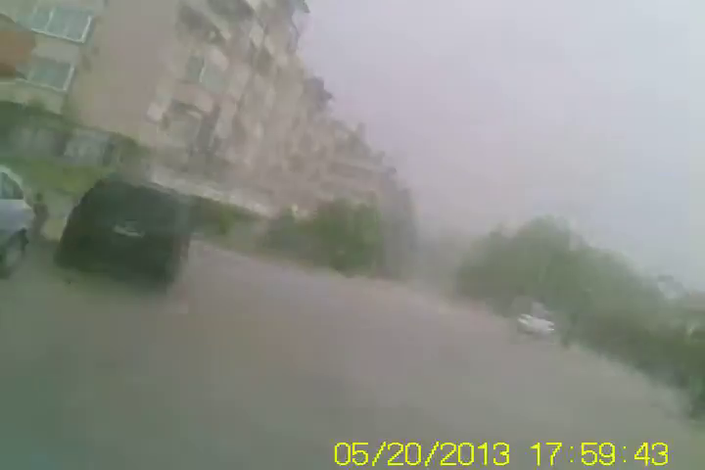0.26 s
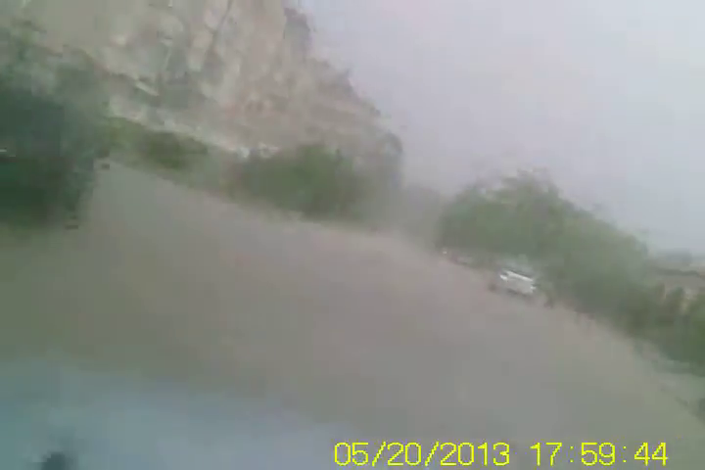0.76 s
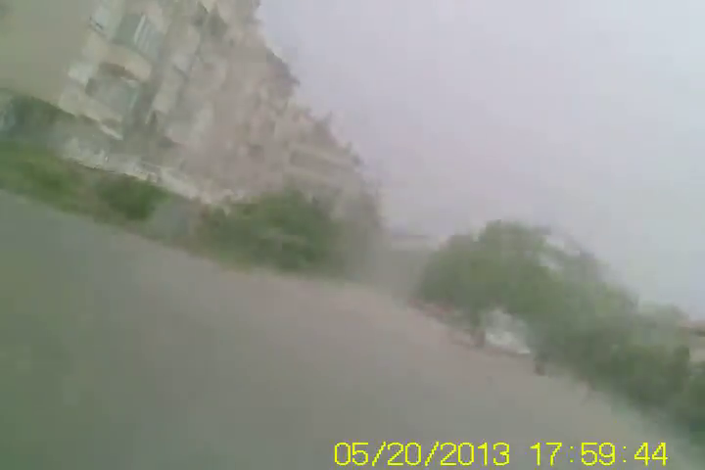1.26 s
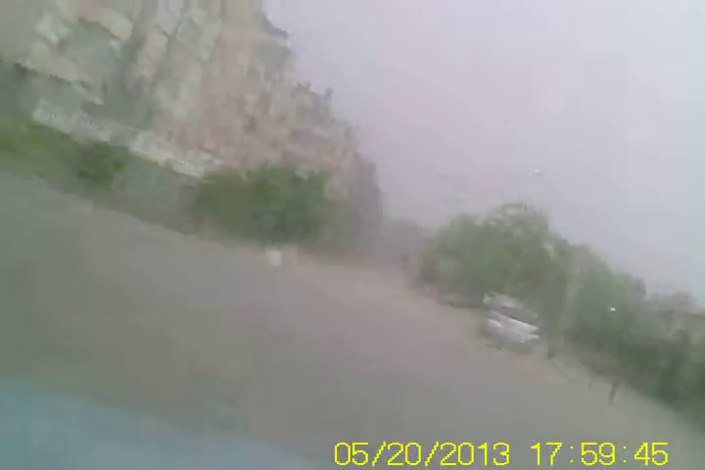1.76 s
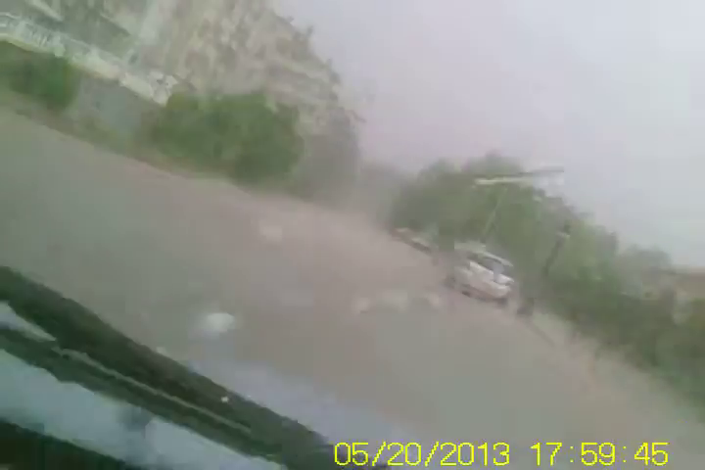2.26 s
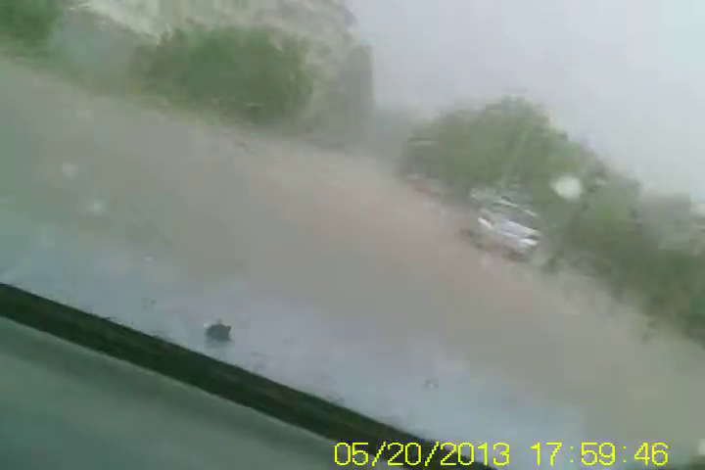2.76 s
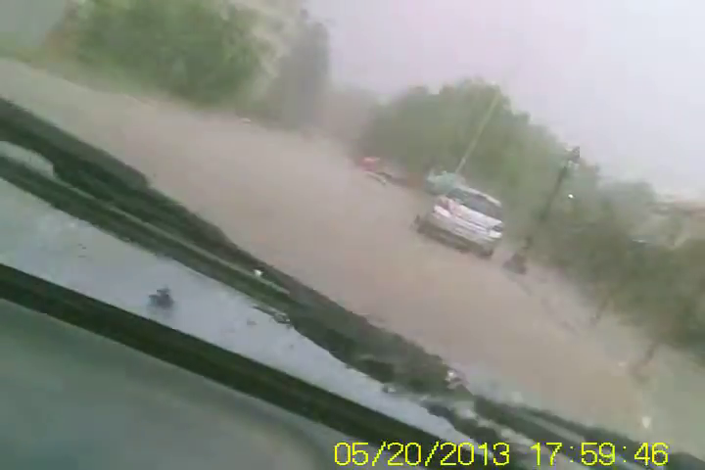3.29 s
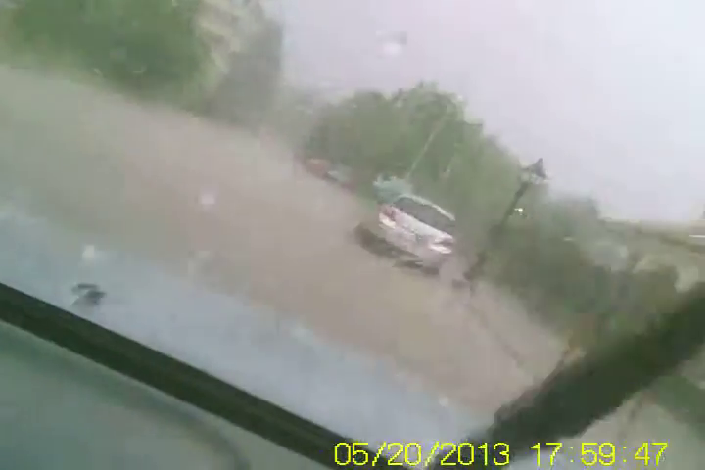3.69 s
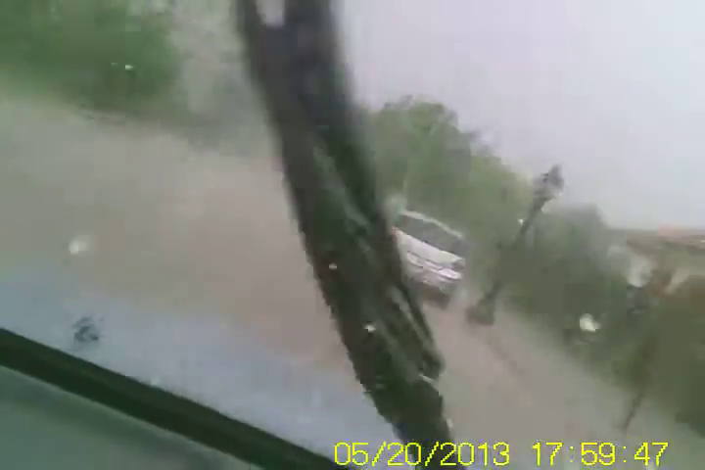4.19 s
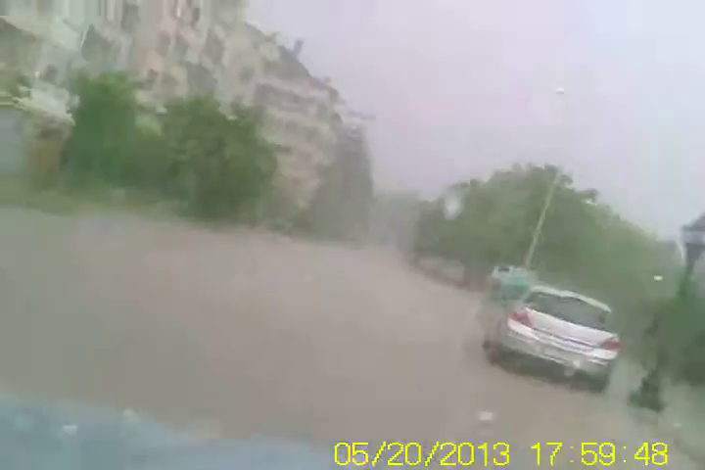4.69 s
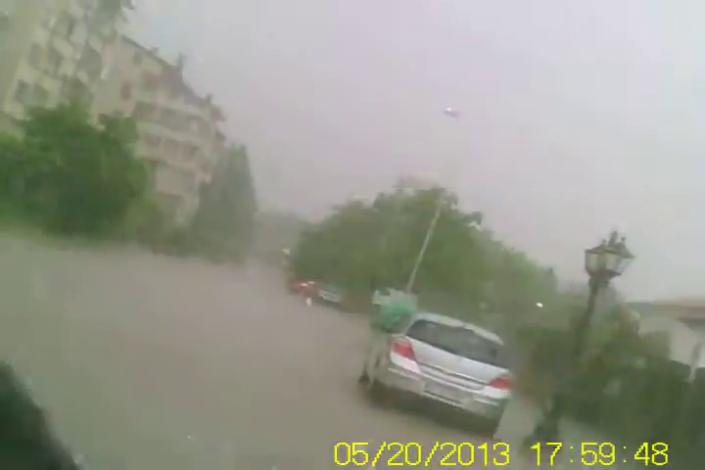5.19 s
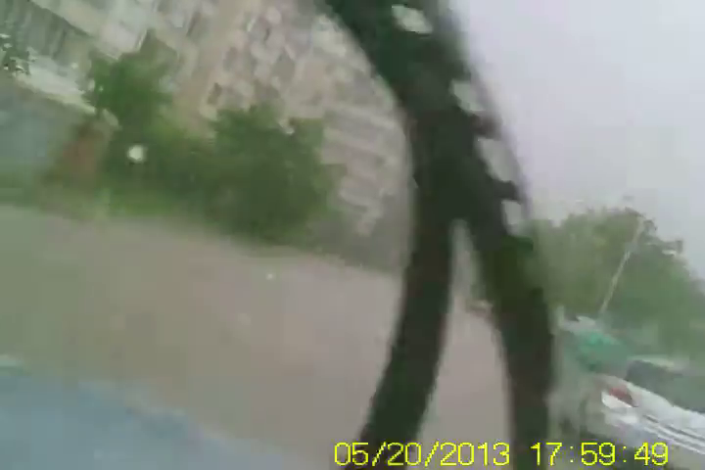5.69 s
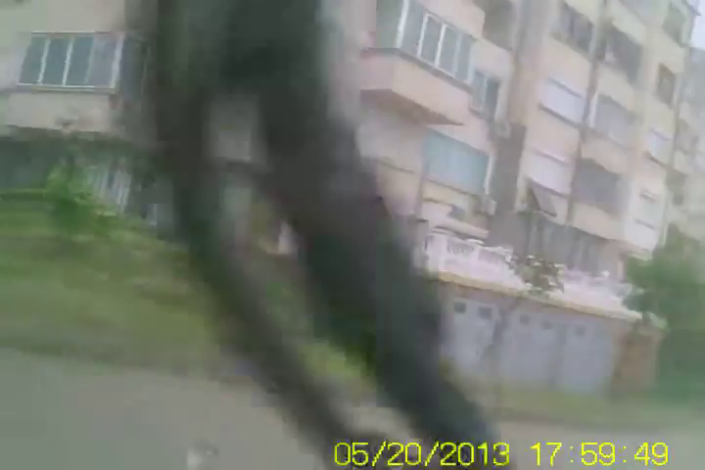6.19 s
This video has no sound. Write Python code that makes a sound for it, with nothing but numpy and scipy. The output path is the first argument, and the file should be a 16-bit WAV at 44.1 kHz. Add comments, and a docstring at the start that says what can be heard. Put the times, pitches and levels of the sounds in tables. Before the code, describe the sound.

Heard from inside a small, padded car cabin: hailstones tick brightly on the glass and knock on the steel roof at irregular intervals, over a dense patter of rain. It starts heavy, with boomy thuds and one very sharp crack early on, thins out in the middle, then thickens again. A low engine throb sinks to idle and the body rumbles softly. A small microphone dulls the highest treble.

```python
"""The front seat of a slowly rolling car in hail and heavy rain.
Hailstones knock on the steel roof and tick on the windscreen: bursts of noise that die away, shaped by the panels.
Rain is a dense patter of tiny blows over steady noise; fat drops swell and heavy blows boom the roof.
Underneath, the engine's sine waves sink to idle, and low noise sways and rumbles over the flooded street."""
import sys
import numpy as np
from scipy import signal
from scipy.fft import rfft, irfft, next_fast_len
from scipy.io import wavfile
from scipy.ndimage import map_coordinates

SR = 44100
rng = np.random.default_rng(int(sys.argv[2]) if len(sys.argv) > 2 else 0)


def transcribe(signal):
    """Save signal, clipped to [-1, 1], as a 16-bit WAV file at the path in sys.argv[1]."""
    frames = np.atleast_2d(signal).T
    limited = np.clip(frames, -1, 1)
    pcm = np.round(limited * 32767).astype(np.int16)
    wavfile.write(sys.argv[1], SR, pcm)


N = 284445

# strength of the downpour before the trims of each layer: time_s, roof_level_db, glass_level_db
DOWNPOUR = [(0.0, -40, -52.5), (0.3, -44.5, -56.5), (0.97, -46.5, -57.5), (1.17, -50, -62),
            (1.35, -53, -61), (1.72, -48.5, -57), (2.05, -53, -64), (2.14, -50.5, -60), (2.87, -52.5, -61),
            (3.09, -54, -58), (3.5, -47.5, -58.5), (3.56, -52, -57), (4.26, -45.5, -55),
            (4.65, -46.5, -57.5), (5.15, -46, -53), (5.59, -47.5, -58.5), (5.69, -47, -55.5),
            (6.45, -46.5, -55)]
# colour of rain drumming on the roof: pitch_hz, level_db (relative)
DRUMMING_COLOUR = [(120, -22.5), (250, 3), (340, 0), (430, 2), (600, -4), (850, -5.5), (1150, -4),
                   (1450, -1.5), (1720, -4), (2050, -18), (2600, -27.5), (5000, -58)]
# colour of rain pattering on the glass: pitch_hz, level_db (relative)
PATTER_COLOUR = [(1200, -36.5), (2200, -2), (2700, -3.5), (3600, 2), (4100, 0.5), (4600, -5), (5400, -8),
                 (6300, -13.5), (7400, -11), (8300, -19), (10200, -18.5)]


def amp(db):
    """Turn decibels into a gain."""
    return 10 ** (np.asarray(db) / 20)


def unit(x):
    """Scale x to an average strength (rms) of 1."""
    return x / np.sqrt(np.mean(x ** 2) + 1e-20)


def along(points, hz):
    """Read a (pitch, value) table at any pitch, on a log pitch axis."""
    table_hz, values = np.transpose(points)
    return np.interp(np.log(hz + 1), np.log(table_hz + 1), values)


def curves(rows):
    """Turn each column after the time into a curve with one value per sample."""
    time_s, *columns = np.transpose(rows)
    return [np.interp(np.arange(N) / SR, time_s, column) for column in columns]


def wobble(rate):
    """A smooth random curve through this many random points a second."""
    points = rng.standard_normal(int(N * rate / SR) + 4)
    return map_coordinates(points, [np.arange(N) * rate / SR])


def swell(s, width_s):
    """A bell-shaped rise and fall around time s, 17 dB down at width_s to either side."""
    out = np.zeros(N)
    first = max(int((s - 2 * width_s) * SR), 0)
    last = min(int((s + 2 * width_s) * SR), N)
    near = np.arange(first, last)
    out[near] = np.exp(-2 * ((near / SR - s) / width_s) ** 2)
    return out


def add(out, s, sound):
    """Mix a sound into out at time s."""
    out[max(round(s * SR), 0):][:len(sound)] += sound


def filtered(x, response):
    """Weight each frequency of x by the gain that response gives."""
    m = next_fast_len(N + SR // 2)
    return irfft(rfft(x, m) * response(np.fft.rfftfreq(m, 1 / SR)), m)[:N]


def band(x, lo_hz, hi_hz, order=3):
    """Keep only the frequencies between two edges, without sounding early."""
    edges = [lo_hz, min(hi_hz, SR / 2 - 1)]
    return signal.sosfilt(signal.butter(order, edges, 'band', fs=SR, output='sos'), x)


def noise(spectrum):
    """Steady noise with this colour, at rms 1."""
    return unit(filtered(rng.standard_normal(N), lambda hz: amp(along(spectrum, hz))))


def ping(spectrum, size=2048):
    """A short click with this colour that starts at once (minimum phase, by way of the cepstrum)."""
    gain = amp(along(spectrum, np.fft.rfftfreq(size, 1 / SR)))
    cepstrum = irfft(np.log(gain))
    # folding the second half onto the first leaves nothing before the start
    cepstrum[1:size // 2] *= 2
    cepstrum[size // 2 + 1:] = 0
    return irfft(np.exp(rfft(cepstrum)))[:size // 2]


def blow(t60, crack, size=2048, crack_t60=0.0038):
    """A hard crack at contact, with bending waves that scatter through the panel and die (t60 in s)."""
    t = np.arange(size) / SR
    decay_s = np.maximum([[t60], [crack_t60]], .001)
    waves, contact = rng.standard_normal((2, size)) * amp(-60 * t / decay_s)
    contact[0] += np.linalg.norm(contact)  # the first wave front arrives in one piece
    return waves / np.linalg.norm(waves) + crack * contact / np.linalg.norm(contact)


def drops(rate, spread_db, t60, spectrum, crack):
    """Drops of random size fall all over a panel, each ringing in its own way; rate is drops a second."""
    out = np.zeros(N + SR)
    for when, size in rng.random((int(rate * N / SR), 2)):
        one_drop = amp(spread_db * size ** 2) * blow(t60, crack, size=1024)
        add(out, when * N / SR, one_drop)
    return unit(signal.oaconvolve(out[:N], ping(spectrum))[:N])


def engine(level_db=0, second_db=-19, third_db=-32):
    """The firing rate and its first two overtones throb unevenly through the floor."""
    # the engine sinking to idle, before small wobbles: time_s, firing_rate_hz, level_db
    idling_down = [(0.0, 43.6, -31.5), (0.72, 42.17, -27.5), (1.78, 40.31, -34.5), (2.06, 38.7, -37.5),
                   (2.35, 32.1, -26), (2.55, 28.6, -38), (3.0, 25.52, -32.5), (3.65, 25.95, -28),
                   (4.89, 25.78, -24.5), (5.3, 27.85, -25.5), (5.68, 26.73, -27.5), (6.09, 25.22, -23.5),
                   (6.32, 22.11, -19), (6.45, 22.17, -25.5)]
    rate, level = curves(idling_down)
    uneven_rate = rate * (1 + 0.016 * wobble(19))
    phase = 2 * np.pi * np.cumsum(uneven_rate) / SR
    throb = np.sin(phase)
    throb = throb + amp(second_db) * np.sin(2 * phase)
    throb = throb + amp(third_db) * np.sin(3 * phase)
    return amp(level + level_db + 0.5 * wobble(14)) * unit(throb)


def ride():
    """The car rolls with a low rumble; each bump sways the body, pumps the cabin air and shakes the tyres."""
    # bumps in the street: centre_s, sway_level_db, rumble_level_db, width_s
    bumps = [(.12, -20.5, -39, 0.38), (.73, -15.5, -32.5, 0.24), (1.08, -17, -38.5, 0.12),
             (2.0, -24.5, -40.5, 0.32), (2.19, -15.5, -48, 0.13), (2.42, -21.5, -50, 0.21),
             (3.47, -32, -42.5, 0.11), (4.8, -32, -42, 0.53), (5.42, -24, -52, .07),
             (6.0, -24.5, -37.5, 0.14), (6.34, -21.5, -35.5, 0.15)]
    # colour of the swaying body: pitch_hz, level_db (relative)
    sway_colour = [(3, 4), (9, 21), (14, 20.5), (22, 13), (32, 10), (45, -15), (80, -62)]
    # colour of the tyre rumble: pitch_hz, level_db (relative)
    road_colour = [(25, -31.5), (42, -3.5), (55, 0), (70, -12), (95, -11.5), (130, -20), (300, -64)]
    sway, rumble = amp(-35), amp(-45)  # between the bumps
    for s, sway_db, rumble_db, width_s in bumps:
        bump = swell(s, width_s)
        # strengths add as energies
        sway = np.hypot(sway, amp(sway_db) * bump)
        rumble = np.hypot(rumble, amp(rumble_db) * bump)
    return sway * noise(sway_colour) + rumble * noise(road_colour)


def rain(roof_db=-1.0, glass_db=-1.5, pellet_db=-8, wash_db=-6, boom_db=-3.5, hiss_db=-4.5, sheets_db=2.5):
    """Sheets of rain drum on the roof, so that the cabin booms, and patter on the glass among tiny ice pellets."""
    # colour of the tiny ice pellets: pitch_hz, level_db (relative)
    pellet_colour = [(300, -24), (1500, -10), (2300, -28), (3700, 9.5), (5400, -12), (6400, -13.5),
                     (7400, 1), (8300, -16), (10200, 6.5)]
    # colour of the booming cabin: pitch_hz, level_db (relative)
    boom_colour = [(70, -15), (110, 0.5), (155, 11), (172, 3.5), (195, -2), (250, -5), (400, -37.5)]
    roof, glass = curves(DOWNPOUR)
    sheets = wobble(35)
    drumming = drops(rate=400, spread_db=8.0, t60=0.048, spectrum=DRUMMING_COLOUR, crack=0.27)
    drumming = drumming + amp(wash_db) * noise(DRUMMING_COLOUR)
    patter = drops(rate=350, spread_db=12, t60=.028, spectrum=PATTER_COLOUR, crack=.45)
    patter = amp(sheets_db * sheets) * (patter + amp(hiss_db) * noise(PATTER_COLOUR))
    pellets = drops(rate=18, spread_db=9, t60=.014, spectrum=pellet_colour, crack=1)
    on_glass = amp(glass_db) * patter + amp(pellet_db) * pellets
    on_roof = amp(roof_db + 1.18 * sheets) * drumming + amp(boom_db) * noise(boom_colour)
    return amp(roof) * on_roof + amp(glass) * on_glass


def splashes(roof_db=-12.5, spray_db=-3.0):
    """A fat drop spreads into a crown of droplets: a short swell of drumming and spray, longer the fatter the drop."""
    # fattest drops and lumps of slush, before the two trims above: centre_s, roof_level_db, spray_level_db
    fat_drops = [(0.104, -28, -45.5), (0.205, -27.5, -43), (0.248, -21, -37.5), (0.403, -25.5, -40),
                 (0.531, -27.5, -43), (0.599, -32, -42.5), (1.049, -34, -45.5), (1.122, -27, -44),
                 (1.256, -32, -45), (1.767, -34.5, -44), (1.834, -31.5, -48), (2.073, -32, -46.5),
                 (3.492, -28, -46.5), (3.733, -33.5, -44), (3.802, -29.5, -44), (4.135, -42, -43),
                 (4.4, -30.5, -41), (4.624, -28, -46.5), (4.703, -35, -44), (4.812, -27.5, -46.5),
                 (4.859, -25.5, -48), (4.995, -28, -44.5), (5.295, -25, -48), (5.336, -25, -45.5),
                 (5.619, -29, -45), (5.922, -28.5, -52), (6.169, -42, -42)]
    usual_width_s, usual_db, doubling_db = .018, -31, 23  # doubling_db more roof level doubles the width
    roof, spray = np.zeros((2, N))
    for s, roof_level, spray_level in fat_drops:
        width_s = usual_width_s * 2 ** ((roof_level - usual_db) / doubling_db)
        crown = swell(s, width_s)
        roof += amp(roof_level + roof_db) * crown
        spray += amp(spray_level + spray_db) * crown
    return roof * noise(DRUMMING_COLOUR) + spray * noise(PATTER_COLOUR)


def thuds(low_hz=148, high_hz=166, upper_db=-3):
    """The roof's two lowest modes ring after a heavy blow."""
    # heavy blows, before a 5 dB lift: start_s, level_db, t60_s (time to fall by 60 dB)
    heavy_blows = [(0.257, -35, 0.21), (0.399, -31, 0.1)]
    out, t = np.zeros(N + SR), np.arange(SR // 4) / SR
    modes = np.sin(2 * np.pi * low_hz * t) + amp(upper_db) * np.sin(2 * np.pi * high_hz * t)
    for s, level_db, t60 in heavy_blows:
        add(out, s, amp(level_db + 5.0 - 60 * t / t60) * modes)
    return out[:N]


def cabin(x, size=8192, build_s=0.0025):
    """The short, padded reverberation of the car's interior: noise that dies faster at higher pitch."""
    # how long the cabin rings: pitch_hz, t60_s (time to fall by 60 dB)
    ring_times = [(150, 0.34), (1500, 0.11), (4000, 0.087), (10000, 0.043)]
    hz, t, z = signal.stft(rng.standard_normal(size), SR, nperseg=256)
    decay = amp(-60 * t / along(ring_times, hz)[:, None])
    tail = signal.istft(z * decay, SR, nperseg=256)[1]
    tail *= 1 - np.exp(-np.arange(len(tail)) / SR / build_s)  # the echoes take a moment to build up
    return signal.fftconvolve(x, tail / np.linalg.norm(tail))


def cushioned(x, corner_hz):
    """A longer contact rounds off the highs."""
    return signal.lfilter(*signal.butter(2, np.clip(corner_hz, 950, 4000), fs=SR), x)


def stone(peak_db, knock_db, splinter_db, shell, crack=0.41, room_db=-12, contact_hz=2600, mush_db=10):
    """One stone: a hard one ticks higher, a mushy one knocks deeper; ice splinters add the top treble."""
    tick = peak_db - 15.5  # a tick's peak stands this far over its body
    knock = knock_db - 1
    hardness = tick - knock
    # above -20.5 dB a stone bounces clear: the ring halves every 4.5 dB
    glass_t60 = 0.024 / 2 ** (max(peak_db + 20.5, 0) / 4.5)
    roof_t60 = 1.47 * glass_t60
    roof = signal.fftconvolve(blow(roof_t60, crack), shell)
    roof = cushioned(roof, contact_hz * 2 ** (hardness / mush_db))
    glass = signal.fftconvolve(blow(glass_t60, crack=.9), shell)
    # 16 dB more hardness lifts the lower edge of the tick an octave, within limits
    edge_hz = np.clip(3130 * 2 ** (hardness / 16), 2650, 4800)
    knock_part = band(roof, 149, 2640)
    tick_part = band(glass, edge_hz, 5970, order=2)
    splinter_part = band(glass, 8580, 14200)
    parts = knock_part, tick_part, splinter_part
    levels = knock, tick, splinter_db + 1
    attack = round(.012 * SR)  # levels are those of the first 12 ms
    hit = sum(amp(db) * part / np.std(part[:attack]) for part, db in zip(parts, levels))
    heard = amp(room_db) * cabin(hit)
    add(heard, 0, hit)
    return heard


def hail(small_db=-3):
    """Big stones stand out, each with its own echo; small ones fall at random, as strong as the downpour."""
    # clearest stones, before the delay below and the trims in stone():
    # time_s, glass_tick_peak_db, roof_knock_db, splinters_db
    big_stones = [(0.0406, -23, -39.5, -52.5), (0.1672, -21.5, -39.5, -49), (0.1885, -25, -35.5, -47),
                  (0.2607, -31, -27.5, -65), (0.4108, -27.5, -32.5, -63), (0.4858, -31, -48, -55),
                  (0.5348, -24.5, -37, -50), (0.5776, -32, -45, -55), (0.685, -10, -31, -34),
                  (0.8212, -21, -35.5, -51), (0.8742, -30.5, -40, -53), (0.9527, -37, -53, -59),
                  (0.9727, -31.5, -46, -56), (1.0052, -21, -31.5, -46.5), (1.169, -29.5, -39.5, -62),
                  (1.3322, -37, -45, -63), (1.4036, -34, -39, -68), (1.51, -32.5, -41, -60),
                  (1.645, -26, -42, -60), (1.7525, -31, -31.5, -68), (1.911, -29, -44, -51),
                  (1.9235, -24.5, -37, -51), (1.9711, -35, -49, -56.5), (2.1131, -29, -48.5, -53.5),
                  (2.1936, -30.5, -41, -53), (2.2334, -30.5, -40.5, -60), (2.3005, -30, -44, -53.5),
                  (2.353, -30, -46.5, -64), (2.4712, -28, -38, -63), (2.4855, -28.5, -40.5, -56),
                  (2.59, -34, -45, -56), (2.8615, -39.5, -42, -59), (2.9825, -29.5, -37, -59),
                  (3.03, -40, -52, -55), (3.0713, -27.5, -42, -69), (3.228, -31.5, -46, -63),
                  (3.457, -24, -37, -53), (3.486, -31.5, -36.5, -56), (3.5044, -30.5, -44, -54),
                  (3.6558, -31.5, -43, -52.5), (3.7702, -24.5, -41, -52), (3.914, -26, -36.5, -52.5),
                  (4.0958, -26, -38, -55), (4.1185, -37, -41.5, -60), (4.1663, -26.5, -40.5, -54),
                  (4.2443, -23.5, -34, -49), (4.4144, -27, -34, -50), (4.517, -29, -38.5, -56),
                  (4.563, -20, -38, -50), (4.8789, -30, -34, -63), (5.0391, -30, -39, -51.5),
                  (5.09, -30, -39, -55), (5.1417, -25.5, -43.5, -51), (5.3704, -26, -41.5, -53),
                  (5.5089, -38.5, -40.5, -67), (5.5902, -23, -33.5, -52.5), (5.6224, -27.5, -39, -50),
                  (5.6529, -25, -38, -48.5), (5.8168, -25.5, -40.5, -51), (5.8707, -29, -38.5, -43.5),
                  (5.8816, -23, -39, -58), (5.9293, -31, -44, -52), (6.0086, -20, -37, -43),
                  (6.0537, -22.5, -39, -45), (6.1232, -32, -47, -51), (6.2068, -20.5, -37.5, -50),
                  (6.323, -31, -42, -55), (6.3455, -25.5, -38, -54), (6.4331, -25, -39, -59)]
    # how roof, glass and cabin colour a blow: pitch_hz, level_db (relative)
    shell_colour = [(60, -32), (160, -5), (330, -6.5), (600, -2.5), (850, -5), (1400, 5), (1700, 5.5),
                    (2250, -4), (3700, 6.5), (4500, -0.5), (5400, -1.5), (6400, -10.5), (7400, -11),
                    (8300, -24.5), (10200, -28)]
    start_delay_s = 0.001001  # every big stone starts this long after its listed time
    out, shell = np.zeros(N + SR), ping(shell_colour)
    for s, peak_db, knock_db, splinter_db in big_stones:
        add(out, s + start_delay_s, stone(peak_db, knock_db, splinter_db, shell))
    small = drops(rate=14, spread_db=6, t60=.02, spectrum=shell_colour, crack=.8)
    glass_db = curves(DOWNPOUR)[1]
    return out[:N] + amp(glass_db + small_db) * small


def scene():
    """Engine, road, rain and hail meet in the cabin."""
    return (engine() + ride() + rain() + splashes() + thuds() + hail())[None]


def record(dry):
    """A small microphone: the top treble rolls off and ends at a band limit."""
    # treble roll-off: pitch_hz, level_db
    roll_off = [(9300, -0.5), (10500, -5.5), (11100, -13.5), (12000, -23)]
    top_hz = 12200
    return filtered(dry[0], lambda hz: amp(along(roll_off, hz)) * (hz < top_hz))[None]


dry = scene()
out = record(dry)
transcribe(out)
```